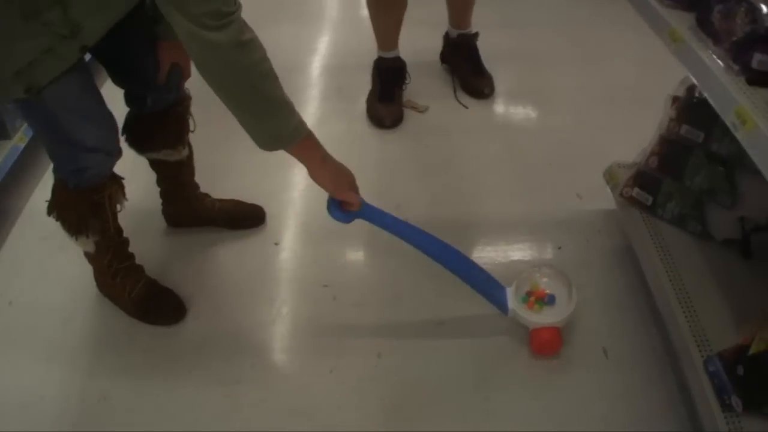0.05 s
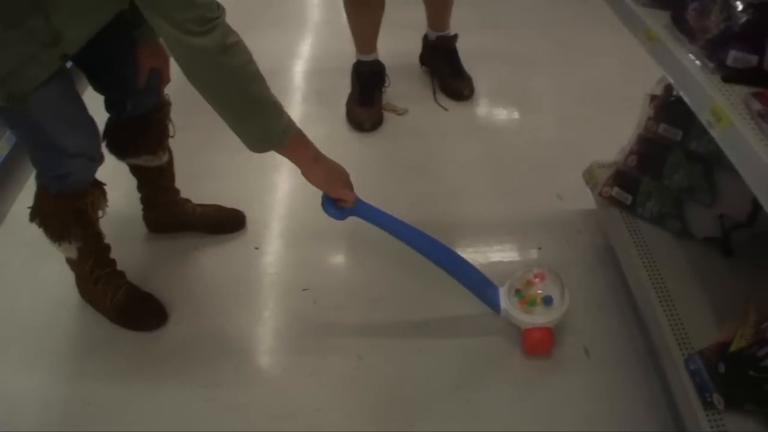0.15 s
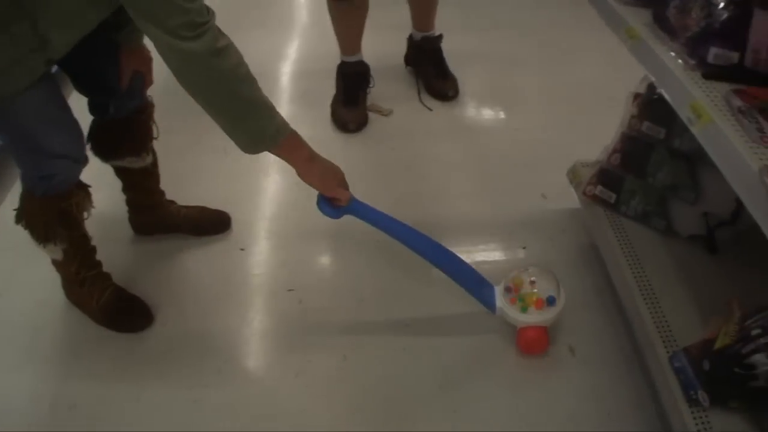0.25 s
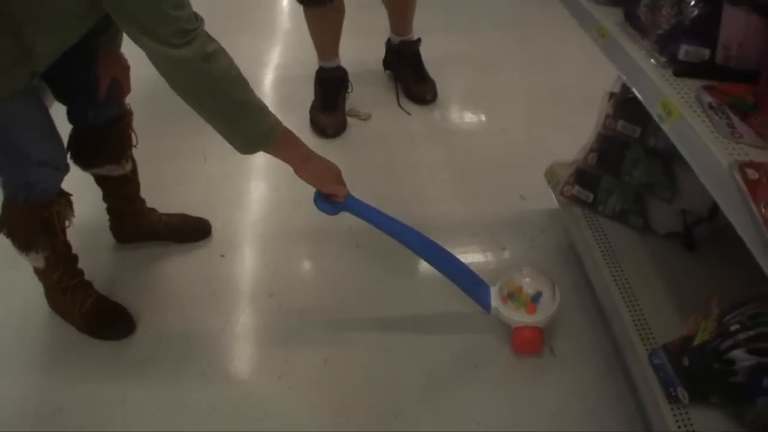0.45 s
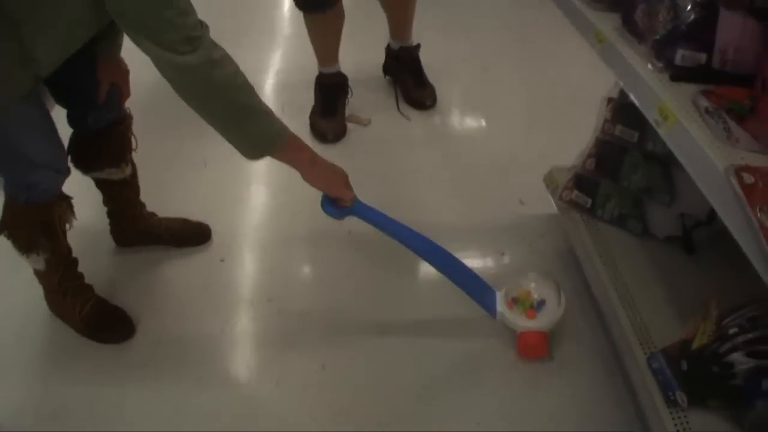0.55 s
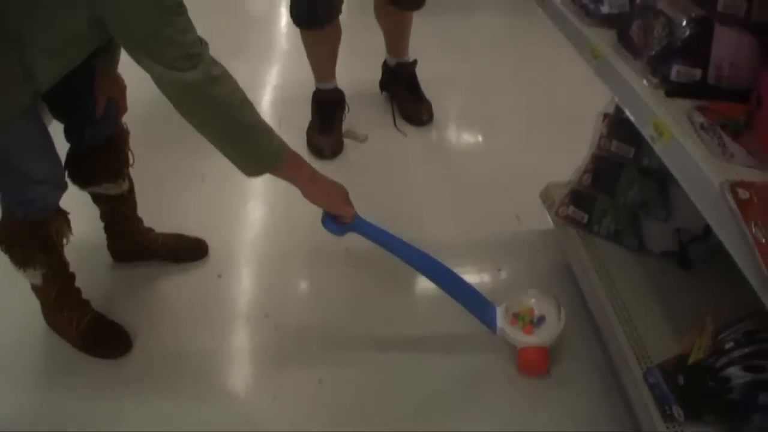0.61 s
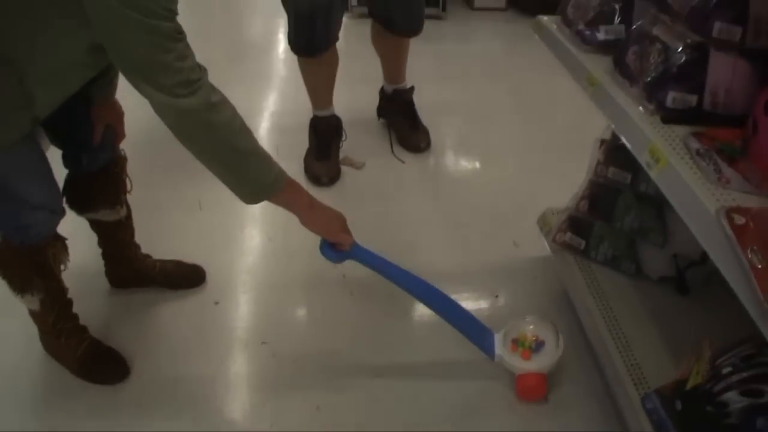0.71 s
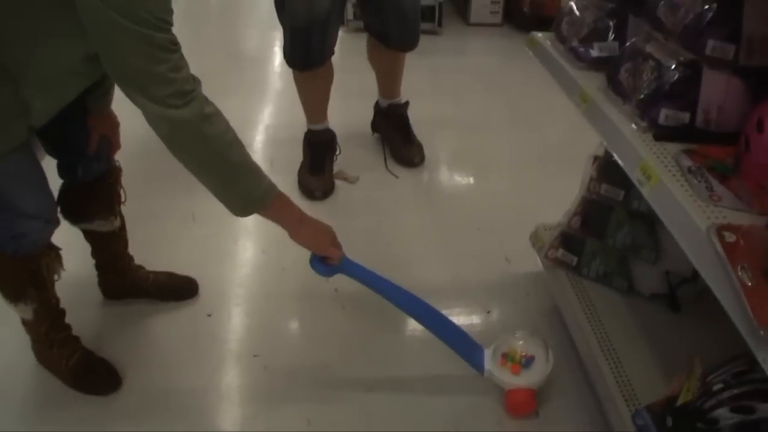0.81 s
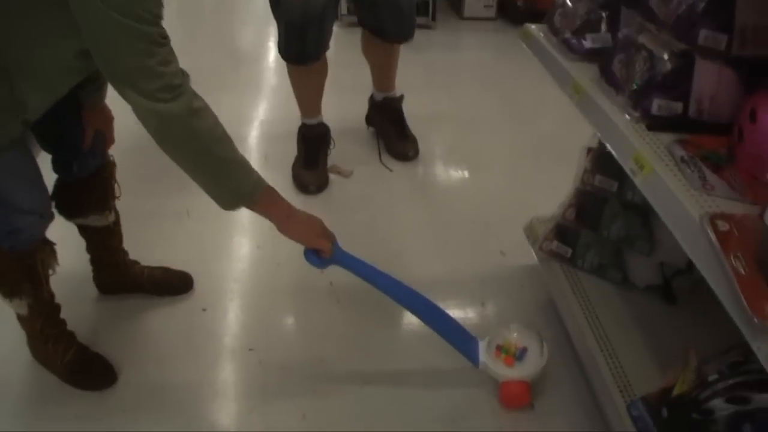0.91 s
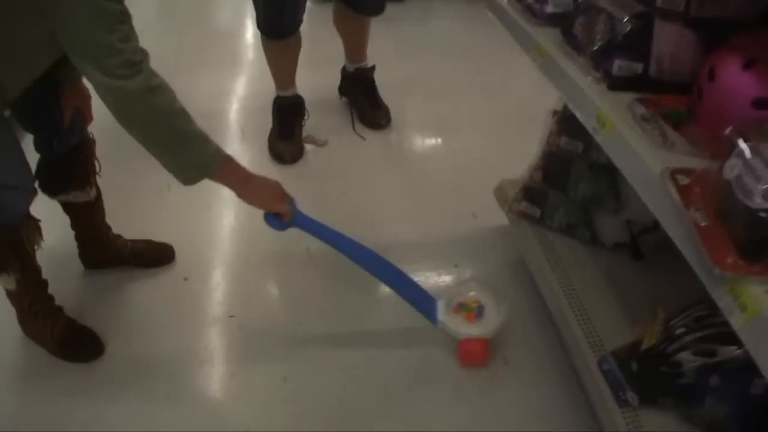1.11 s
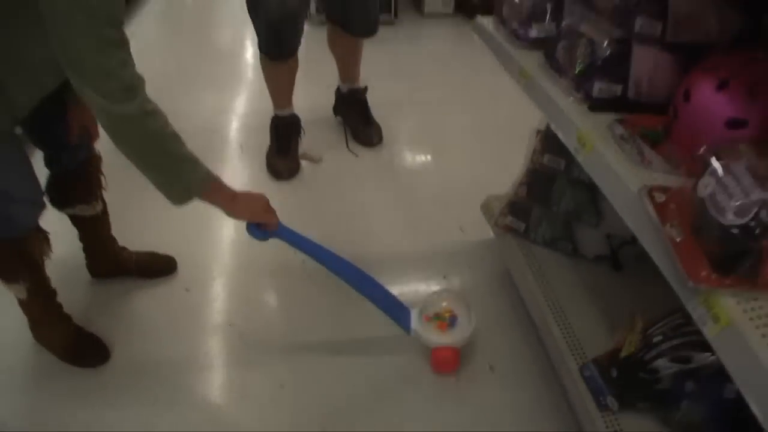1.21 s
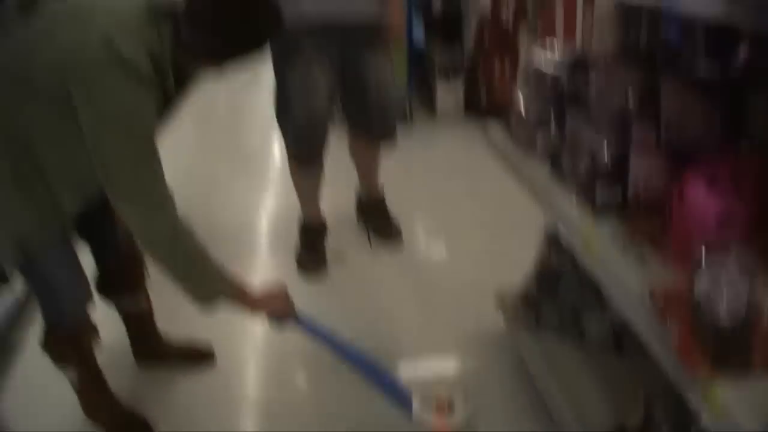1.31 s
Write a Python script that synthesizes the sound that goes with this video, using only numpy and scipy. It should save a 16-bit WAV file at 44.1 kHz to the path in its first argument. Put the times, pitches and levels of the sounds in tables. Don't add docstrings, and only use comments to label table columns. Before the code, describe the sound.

A ball-popper push toy rolls on a hard shop floor: soft rattle and wheel scuff, then one loud snap and a rapid clatter of plastic balls in the dome, settling into faint ticks, heard close in stereo.

```python
import sys
import numpy as np
from scipy import signal
from scipy.fft import rfft, irfft, next_fast_len
from scipy.io import wavfile
from scipy.ndimage import uniform_filter1d

SR = 44100
rng = np.random.default_rng(int(sys.argv[2]) if len(sys.argv) > 2 else 0)


def volts_from_db(level):
    exponent = np.asarray(level, float) / 20
    return 10 ** exponent


def put_to_file(sound):
    columns = np.atleast_2d(sound).T
    safe = np.clip(columns, -1, 1)
    whole_steps = np.round(safe * 32767)
    wavfile.write(sys.argv[1], SR, whole_steps.astype(np.int16))


N = 59535

# start_s, dome_peak_db, drum_db, base_db, crack_db
THROWS = [(.2305, -13.5, -22, -26.5, -19), (0.2332, -15.5, -20.5, -16, -22), (0.2374, -15, -52, -48, -29),
          (0.2409, -19, -42, -45, -23.5), (0.2459, -19, -31, -32, -23), (0.251, -23, -43, -27, -42),
          (0.2572, -3.5, -20.5, -15, -16.5), (0.263, -10, -22.5, -21, -25), (0.2675, -9, -25, -25, -24),
          (0.2715, -19, -26, -21.5, -26.5), (.2764, -22, -28, -35, -29.5), (0.2809, -22, -37, -38, -47),
          (0.2849, -12, -45, -28.5, -25), (0.294, -20, -64, -45, -39), (0.301, -39, -37, -48, -25.5),
          (0.3042, -9, -33, -30, -24.5), (0.305, -34, -40, -35, -24), (0.3082, -29, -22, -49, -23),
          (.3125, -12.5, -37, -39, -28), (.318, -19, -29, -25, -28.5), (0.3239, -26, -39, -30, -30),
          (0.328, -13, -31.5, -30, -21.5), (0.3316, -12.5, -37.5, -22.5, -22),
          (0.334, -38, -42.5, -35, -27), (.3380, -24, -64, -20, -22.5), (.343, -24, -37, -30, -27),
          (0.3469, -41, -44, -50, -25.5), (.353, -42, -48, -28, -28), (0.3586, -43, -33, -51, -48),
          (0.373, -35, -43.5, -35, -28), (.381, -30, -38, -36, -37), (0.3921, -36, -48, -40, -30.5)]
# dome_db, drum_db, base_db, crack_db
THROW_GAIN_DB = np.array([-2.0, 4.0, 3.5, 6.0])
# start_s, peak_db, hardness_db, drum_re_base_db
SETTLES = [(.0203, -23, -21, -21), (0.0269, -18.5, -16.5, -14), (.049, -28, -4, 0), (.443, -18.5, -6.5, -5),
           (0.454, -20, 2, -27), (0.486, -27, -8, -2), (.4922, -21, -3, -18), (.512, -27.5, -2, -16),
           (0.5308, -29, -11, -17), (.5488, -18.5, -8, -10.5), (.557, -21, -11.5, -30),
           (.604, -39, -22, -19), (.628, -27, -15.5, -8), (.646, -26.5, -36, -11), (.652, -27.5, -30, -34),
           (.668, -30, -38, -10), (0.713, -53, -24, -18), (0.7408, -30, -23, -13),
           (0.753, -36.5, -20, -6.5), (0.761, -41, -27, -23), (.783, -37, -27, -11), (.797, -35, -36, -3),
           (.807, -32, -36, -19), (0.828, -42, -27, -15), (.855, -35, -18, 0), (.868, -39, -22, -11),
           (0.956, -40.5, -5, -8), (.9641, -37, -12, -3), (0.979, -52, -15, -19), (0.986, -32.5, -14, -18),
           (.994, -35.5, -10, -19), (1.004, -41, -12, -20), (1.0991, -35, -43, -16), (1.126, -45, -34, -20)]
# time_s, level_db, hardness_db, drum_re_base_db
JOSTLE = [(0, -40.5, -25, -3), (.045, -31.5, -12, -6.5), (0.102, -45, -6.5, 1.5), (0.219, -48.5, -5, -0.5),
          (0.222, -21.5, -0.5, -14), (.35, -49, 10, 8), (.42, -38, 2, -8), (.541, -32.5, -10, -5),
          (.6, -36.5, -26, -3.5), (.7, -41, -24, -10), (0.868, -42.5, -22, -5), (.92, -68.5, -12, 13.5),
          (.99, -43.5, -10, -12), (1.051, -69.5, -3, 11.5), (1.121, -47, -15, -5.5),
          (1.177, -36, -30, -13.5), (1.258, -40, -13.5, -7), (1.35, -55, -34, -3.5)]
# pitch_hz, level_db, t60_s
BASE = [(875, -30, 0.013), (917, -13, 0.078), (1012, 5, 0.046), (1122, 6, 0.028), (1242, -4, 0.05),
        (1359, 3, 0.037)]
# pitch_hz, level_db, t60_s
DRUM = [(219, -10.5, 0.043), (385.3, -10.5, 0.12), (453, -0.5, 0.093), (550, 1.5, 0.053),
        (699, -4.5, 0.064)]
# pitch_hz, level_db, t60_s
DOME = [(1595, -4, 0.027), (1622, -4, 0.026), (1820, -0.5, 0.044), (2019, 5.5, 0.017), (2099, 8.5, 0.02),
        (2280, -3, 0.035), (2620, -12.5, 0.023), (2797, -8.5, 0.039), (2770, -39, 0.0289)]
# pitch_hz, level_db, t60_s
SHELL = [(3550, -6, 0.019), (4380, -2.5, 0.025), (4790, -1, 0.025), (5510, -0.5, 0.019), (6780, 5, 0.019),
         (11100, -2, 0.01)]
# freq_hz, density_db_per_hz
CRACK = [(1470, -34), (2500, -2.5), (3890, -3.5), (6850, -8.5), (11500, -18), (14600, -26.5),
         (15500, -22.5)]
# pitch_hz, level_db, t60_s
SNAP = [(246.5, -15, 0.056), (500, -4.5, 0.04), (770, -6, 0.026), (820, -7.5, 0.027), (1003, -3.5, 0.058),
        (1104, -3, 0.025), (1530, -11, 0.016), (2087, -10.5, 0.025)]
# start_s, peak_db, width_s
SMACKS = [
    (.2582, 1.5, 0.00017),
    (.3303, -7, 0.00011),
    (0.4432, -25, 0.00014),
    (0.5491, -22.5, 0.00017),
]
# start_s, pitch_hz, level_db, rise_s
SCUFFS = [(0.0215, 1074, -27.5, 0.00065), (0.027, 1354, -27, 0.002), (.055, 1241, -34.5, 0.0062),
          (.09, 1365, -39.5, 0.012), (.125, 1154, -38.5, 0.032), (.5, 549.4, -35, 0.0071),
          (.6, 700, -44.5, .03), (.645, 463, -36, 0.029), (1.14, 1254, -43, 0.014),
          (1.168, 1420, -38.5, 0.017), (1.19, 1103, -41, 0.015), (1.229, 500, -48.5, 0.0024),
          (1.319, 1279, -45.5, 0.028)]
# start_s, peak_db, pitch_hz
TICKS = [
    (0.7229, -45, 11800),
    (0.8524, -52, 11850),
    (.858, -52, 11600),
    (.954, -45, 9800),
    (0.968, -51, 6740),
    (0.9921, -45, 11800),
    (1.0574, -48, 10830),
    (1.0635, -37.5, 11700),
]
# freq_hz, left_minus_right_db
PORT_BALANCE = [(250, 4), (1000, 0.5), (8000, -0.4)]
# freq_hz, level_db
SCATTER = [(300, -21), (1500, -6), (4000, -4.5), (10000, 2)]
# freq_hz, t60_s
AISLE = [(200, 0.3), (1000, 0.78), (3000, 0.72), (8000, 0.67), (15000, 0.4)]
# freq_hz, density_db_per_hz
HUM = [(20, -23), (100, 1), (260, 0.5), (1000, -5), (2500, -11), (4300, -10.5), (9000, -16), (16000, -22)]
# freq_hz, likeness_0_to_1
HUM_SAME = [(40, 0.67), (150, 0.83), (950, 0.12), (15000, 0.39)]
# centre_s, half_length_s, treble_lift_db
HISS = [
    (.13, 0.12, 10.1),
    (1.13, 0.1, 5.6),
]
# treble_db, edge_hz
TOP_EDGE = [(-66, 13500), (-58, 14000), (-48, 14200), (-40, 14900), (-30, 15300), (-24, 16300)]

SPOT_DB, LOOSE_SPOT_DB, DETUNE = 2.5, 4.5, 0.015
LOOSE_DULL_DB_PER_OCT, DULL_HZ = 5, 4000
CRACK_T60_S, CRACK_RISE_S, CRACK_DB, SHELL_DB = 0.032, 0.00081, 0.5, -4.5
DOME_DB, DOME_FOLLOW = 1.5, 0.35
SNAP_S, SNAP_DB, SNAP_CRACK_DB, SNAP_RISE_S = 0.2262, -1, -9.5, 0.001
LAG_S, CHATTER_S, CHATTER_DB, BOUNCE = 0.0008, 0.004, -0.5, 0.43
JOSTLE_PER_S, JOSTLE_SPREAD_DB, JOSTLE_DB = 600, 3.5, -10
SCUFF_CYCLES, SCUFF_ROUGH, SCUFF_WET_DB = 117, 0.12, -5
TICK_T60_S = 0.0085
SMALL_HZ, SMALL_ORDER = 313, 3
SCATTER_S, AISLE_DB = 0.011, -9
HUM_DB, PATCH_DB, HISS_HZ = -55.5, 2.1, 9400


def evened(x):
    return x / np.sqrt(np.mean(x ** 2) + 1e-20)


def read(points, hz):
    f, value = np.transpose(points)
    return np.interp(np.log(hz + 1), np.log(f + 1), value)


def add(mix, start_s, sound):
    part = mix[round(start_s * SR):][:len(sound)]
    part += sound[:len(part)]


def ring(modes, t, spot_db=SPOT_DB):
    hz, db, t60_s = np.transpose(modes)[:, :, None]
    spot, tune, sign = rng.standard_normal((3, len(modes), 1))
    phase = 2 * np.pi * hz * (1 + DETUNE * tune * spot_db / SPOT_DB) * t
    level = np.sign(sign) * volts_from_db(db + spot_db * spot - 60 * t / t60_s)
    x = (level * np.sin(phase)).sum(0)
    return x / abs(x).max()


def snap():
    out, t = np.zeros(N), np.arange(6144) / SR
    plate = np.minimum(t / SNAP_RISE_S, 1) * ring(SNAP, t, 0)
    crack = knock()[-1]
    add(out, SNAP_S, volts_from_db(SNAP_DB) * (plate + volts_from_db(SNAP_CRACK_DB) * crack))
    return out


def knock(spot_db=SPOT_DB, dull_db=0):
    t = np.arange(6144) / SR
    hz = np.fft.rfftfreq(len(t), 1 / SR)
    noise = rng.standard_normal(len(t)) * volts_from_db(-60 * t / CRACK_T60_S)
    colour_db = read(CRACK, hz) - dull_db * np.log2(1 + hz / DULL_HZ)
    burst = irfft(rfft(noise) * volts_from_db(colour_db))
    burst = burst * (t < CRACK_T60_S) * np.minimum(t / CRACK_RISE_S, 1)
    crack = volts_from_db(CRACK_DB) * burst / abs(burst).max()
    crack = crack + volts_from_db(SHELL_DB - dull_db) * ring(SHELL, t, spot_db)
    return np.array([ring(DOME, t, spot_db), ring(DRUM, t), ring(BASE, t, spot_db), crack])


def shares(hard_db, drum_db):
    return volts_from_db([DOME_DB + DOME_FOLLOW * hard_db, drum_db, 0 * hard_db, hard_db])


def throws():
    out = np.zeros(N)
    for start_s, *part_db in THROWS:
        add(out, start_s + LAG_S, volts_from_db(part_db + THROW_GAIN_DB) @ knock())
    return out


def smacks():
    out, t = np.zeros(N), np.arange(200) / SR
    for start_s, db, width_s in SMACKS:
        u = t / width_s
        add(out, start_s, -volts_from_db(db) * u * (2 - u) * np.exp(-u))
    return out


def settles(chatters=4):
    out = np.zeros(N)
    for start_s, db, hard_db, drum_db in SETTLES:
        contact = shares(hard_db, drum_db) @ knock(LOOSE_SPOT_DB, LOOSE_DULL_DB_PER_OCT)
        blow = np.zeros(7000)
        add(blow, 0, contact / BOUNCE)
        for late, size in rng.random((chatters, 2)):
            add(blow, late * CHATTER_S, (2 * size - 1) * contact)
        add(out, start_s + LAG_S, volts_from_db(db + CHATTER_DB) * blow / abs(blow).max())
    return out


def jostle(spots=20):
    time_s, *columns = np.transpose(JOSTLE)
    level_db, hard_db, drum_db = [np.interp(np.arange(N) / SR, time_s, c) for c in columns]
    spread_db = JOSTLE_SPREAD_DB * np.minimum(rng.exponential(1, N), 3)
    hits = volts_from_db(spread_db) * (rng.random(N) < JOSTLE_PER_S / SR) * rng.choice([-1., 1.], N)
    parts = hits * volts_from_db(level_db + JOSTLE_DB) * shares(hard_db, drum_db)
    spot, out = rng.integers(0, spots, N), np.zeros(N)
    for k in range(spots):
        contact = knock(LOOSE_SPOT_DB, LOOSE_DULL_DB_PER_OCT)
        out += signal.oaconvolve(parts * (spot == k), contact, axes=1)[:, :N].sum(0)
    return out


def scuffs():
    out, t = np.zeros(N), np.arange(8000) / SR
    for start_s, hz, db, rise_s in SCUFFS:
        flutter = 1 + SCUFF_ROUGH * evened(uniform_filter1d(rng.standard_normal(len(t)), size=200))
        fade_db = -60 * np.maximum(t - rise_s, 0) * hz / SCUFF_CYCLES
        level = np.minimum(t / rise_s, 1) * flutter * volts_from_db(db + fade_db)
        add(out, start_s, level * np.sin(2 * np.pi * hz * t))
    return out


def axle():
    out, t = np.zeros(N), np.arange(900) / SR
    for start_s, db, hz in TICKS:
        level = np.minimum(t / 0.001, 1) * volts_from_db(db - 60 * t / TICK_T60_S)
        add(out, start_s, level * np.sin(2 * np.pi * hz * t))
    return out


def ports(x):
    size = next_fast_len(N + 2048)
    hz, t = np.fft.rfftfreq(size, 1 / SR), np.arange(2048) / SR
    near = rng.standard_normal((2, 2048)) * np.exp(-t / SCATTER_S)
    near = rfft(near / np.linalg.norm(near[0]), size) * volts_from_db(read(SCATTER, hz))
    half = volts_from_db(read(PORT_BALANCE, hz) / 2)
    balance = np.array([half, 1 / half])
    return irfft(rfft(x, size) * (1 + near) * balance, size)[:, :N]


def aisle(x):
    taps = np.zeros((3, SR))
    at = np.arange(200, SR - 20, 20) + rng.integers(0, 20, (3, (SR - 201) // 20))
    np.put_along_axis(taps, at, rng.choice([-1., 1.], at.shape), 1)
    hz, t, z = signal.stft(taps, SR, nperseg=256)
    own = np.clip(0.29 + hz / 9000, 0, 1)[:, None]
    z = np.sqrt(1 - own ** 2) * z[2] + own * z[:2]
    fade = volts_from_db(-60 * t / read(AISLE, hz)[:, None])
    tail = signal.istft(z * fade, SR, nperseg=256)[1]
    return signal.fftconvolve(x[None], tail / np.linalg.norm(tail[0]), axes=1)[:, :N]


def hum():
    frames, hz = N // 256 + 5, np.fft.rfftfreq(1024, 1 / SR)
    a, b, c, d, patches = rng.standard_normal((frames, 513, 5)).T
    patches = uniform_filter1d(patches, size=12, axis=0)
    patches = evened(uniform_filter1d(patches, size=14, axis=1))
    same = np.clip(read(HUM_SAME, hz), -1, 1)[:, None]
    left = a + 1j * b
    right = same * left + np.sqrt(1 - same ** 2) * (c + 1j * d)
    t = np.arange(frames) * 256 / SR
    push_db = sum(db * np.exp(-((t - mid_s) / half_s) ** 2) for mid_s, half_s, db in HISS)
    hiss_db = push_db * (hz[:, None] > HISS_HZ)
    z = np.array([left, right]) * volts_from_db(read(HUM, hz)[:, None] + PATCH_DB * patches + hiss_db)
    return volts_from_db(HUM_DB) * evened(signal.istft(z, nperseg=1024, noverlap=768)[1][:, :N])


def scene():
    small = signal.butter(SMALL_ORDER, SMALL_HZ, "high", fs=SR, output="sos")
    contacts = snap() + throws() + smacks() + settles() + jostle()
    hits, rubs = signal.sosfilt(small, [contacts, scuffs()])
    echoes = volts_from_db(AISLE_DB) * aisle(hits + volts_from_db(SCUFF_WET_DB) * rubs)
    return ports(hits + rubs) + echoes + axle() + hum()


def roll_off(x):
    return signal.sosfilt(signal.butter(12, 16320, fs=SR, output="sos"), x)


def record(dry):
    hz, _, z = signal.stft(np.clip(dry, -1, 1), SR, nperseg=1024)
    treble_power = (abs(z[:, hz > 8000]) ** 2).mean(0).sum(0)
    treble_db = 10 * np.log10(treble_power + 1e-12)
    edge_hz = uniform_filter1d(np.interp(treble_db, *np.transpose(TOP_EDGE)), size=3)
    mix = signal.istft(z * (hz[:, None] < edge_hz), SR, nperseg=1024)[1][:, :N]
    return roll_off(mix)


dry = scene()
out = record(dry)
put_to_file(out)
```